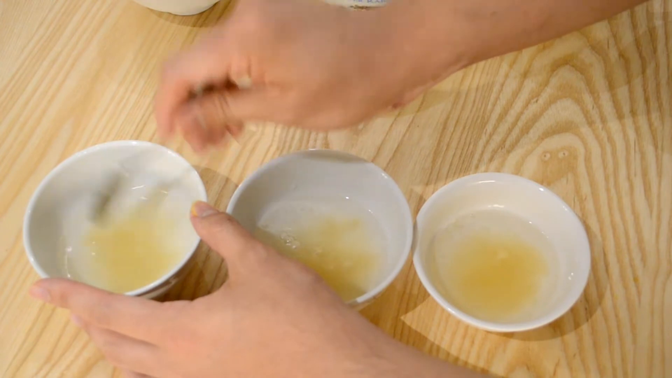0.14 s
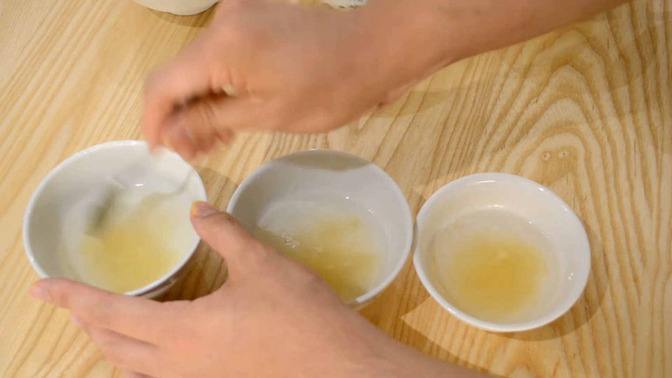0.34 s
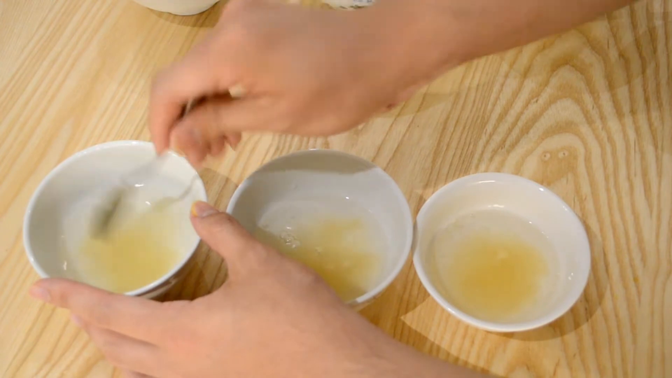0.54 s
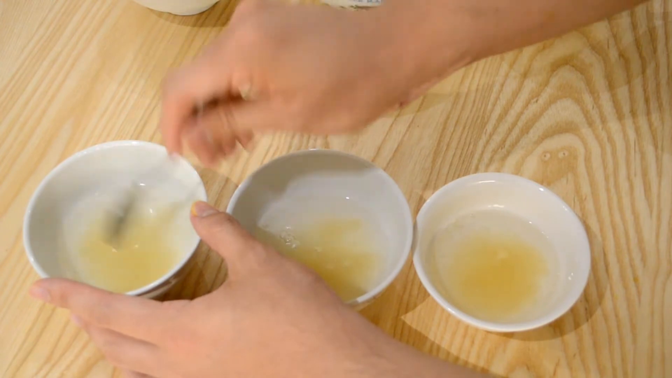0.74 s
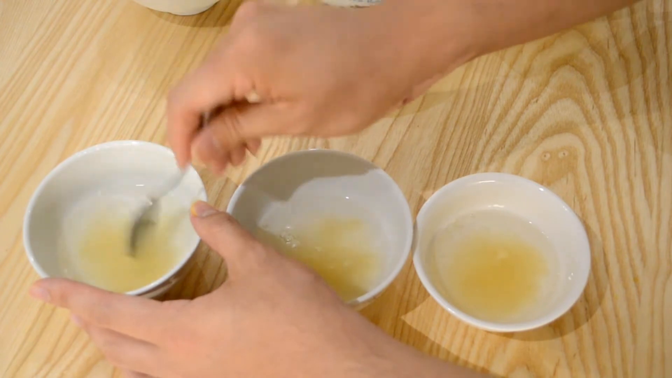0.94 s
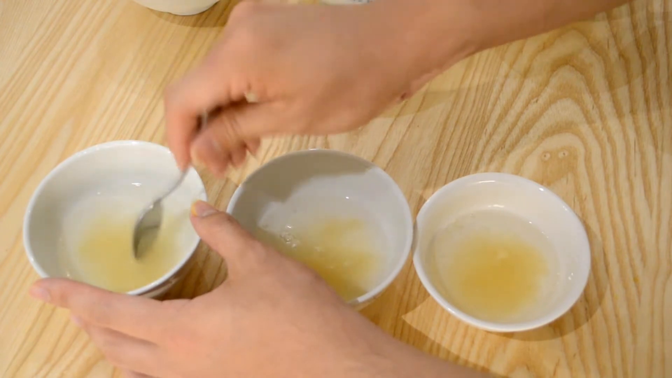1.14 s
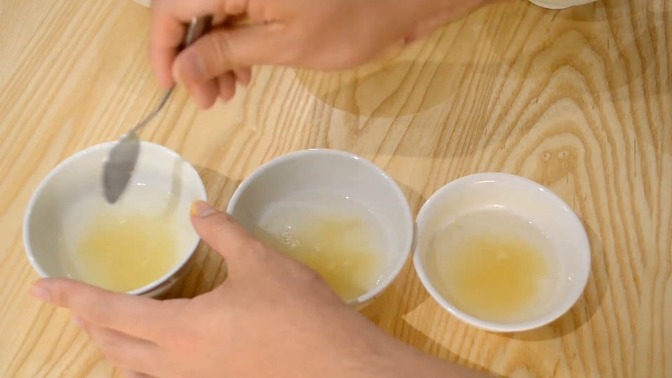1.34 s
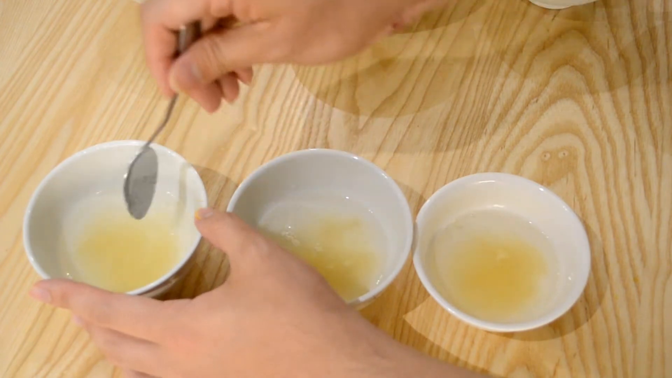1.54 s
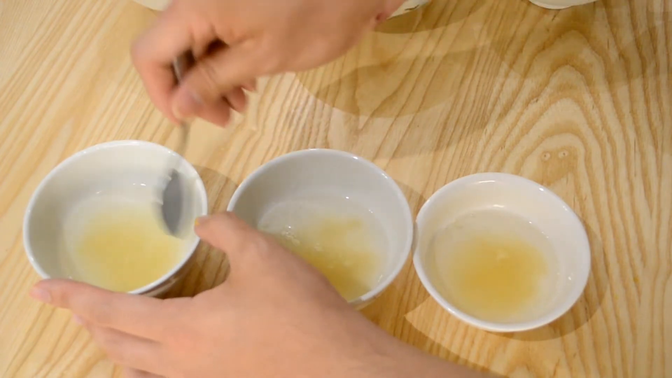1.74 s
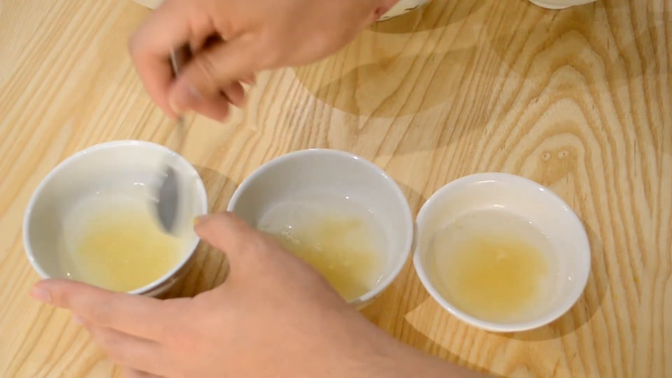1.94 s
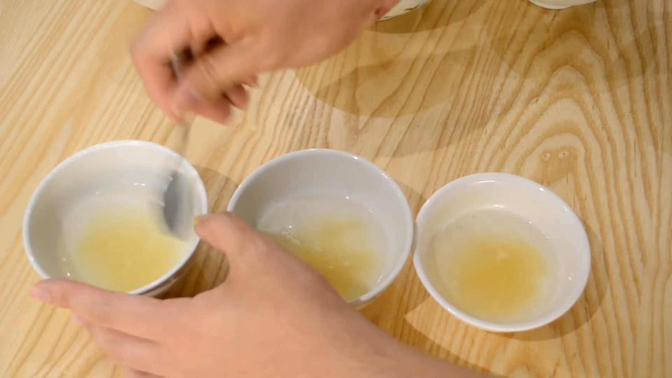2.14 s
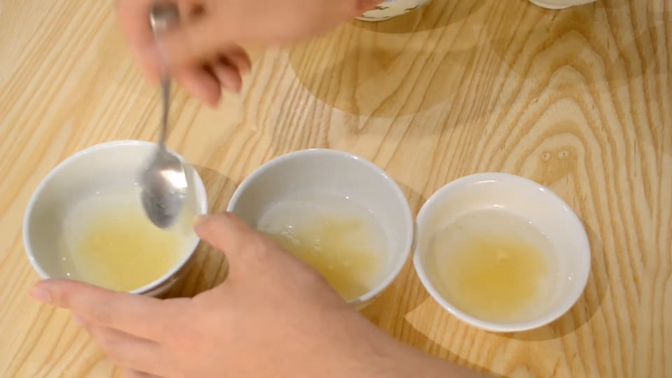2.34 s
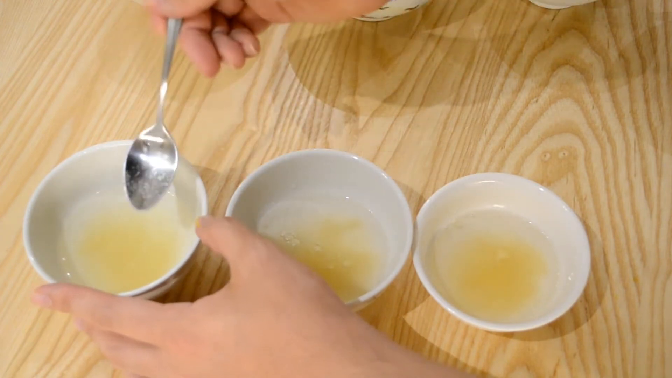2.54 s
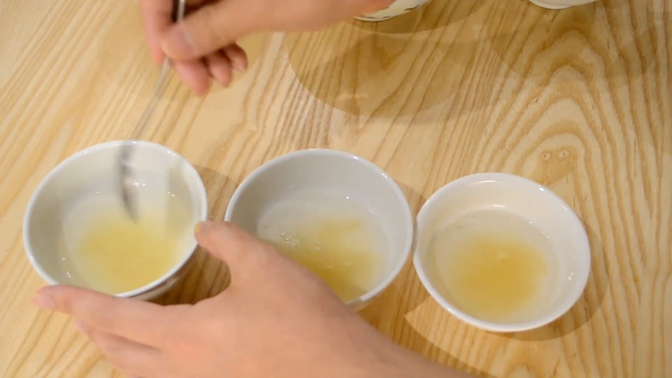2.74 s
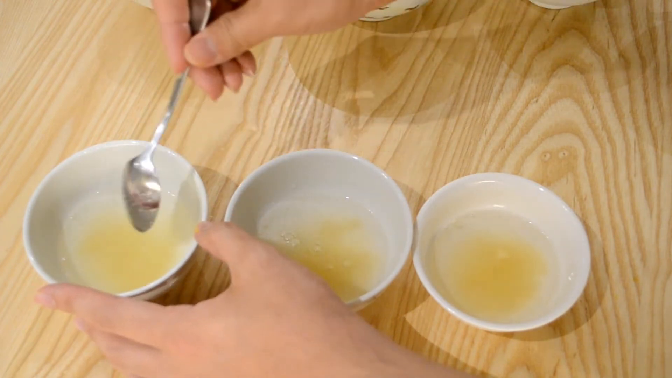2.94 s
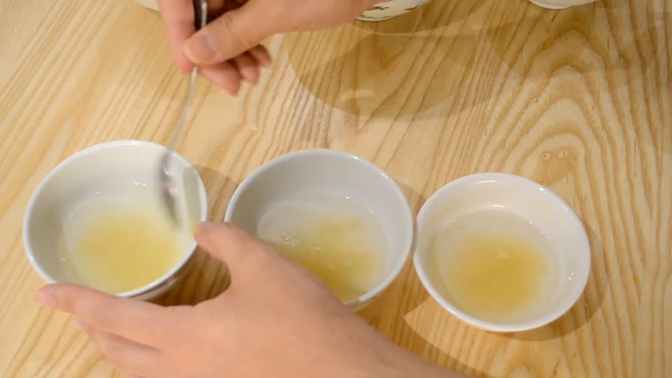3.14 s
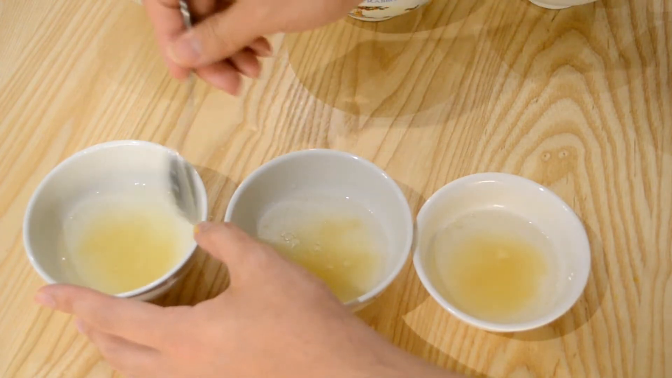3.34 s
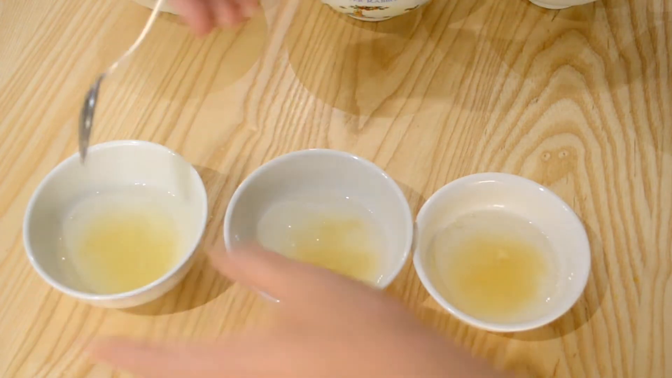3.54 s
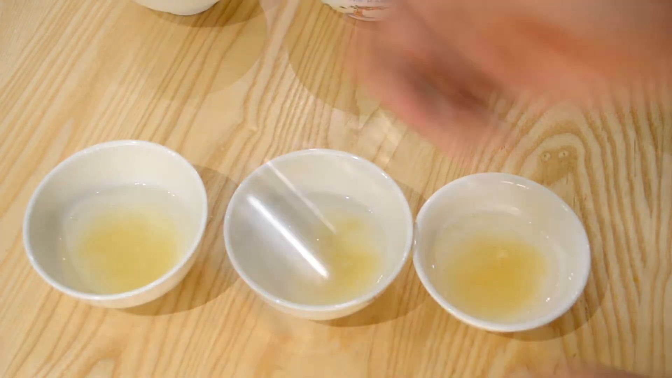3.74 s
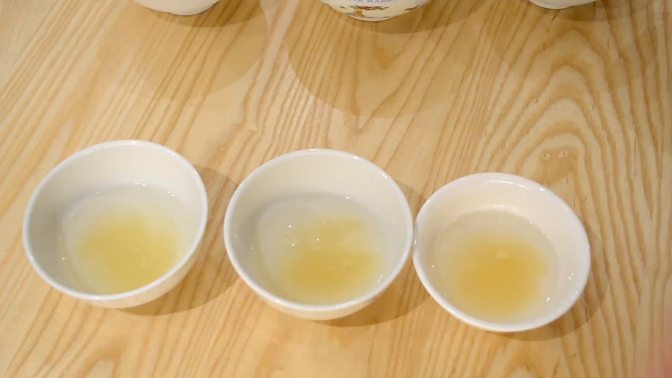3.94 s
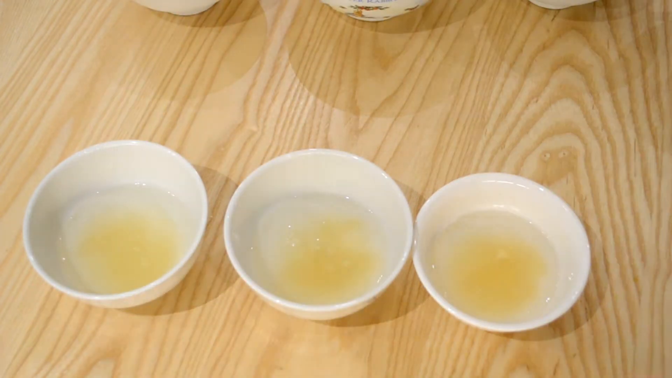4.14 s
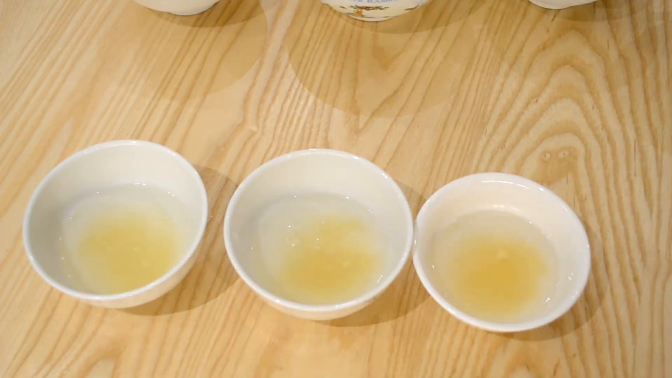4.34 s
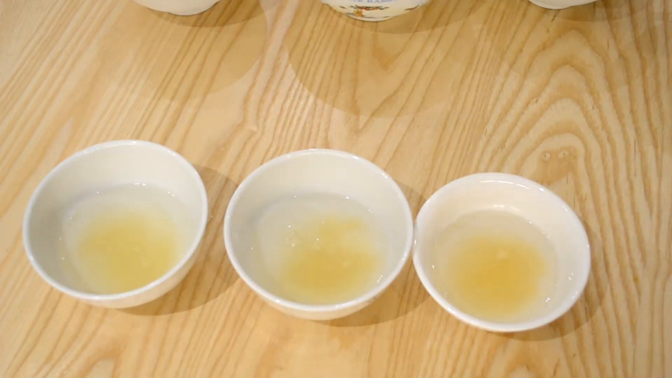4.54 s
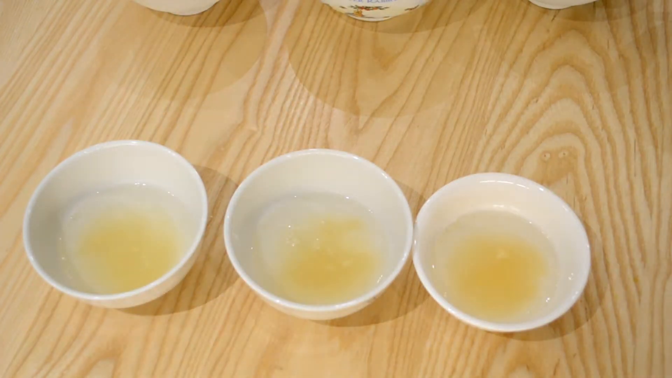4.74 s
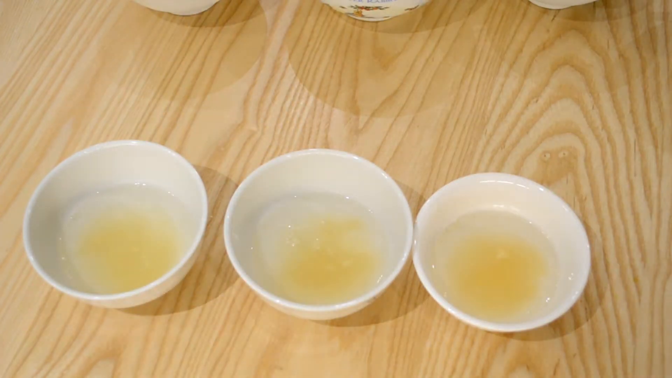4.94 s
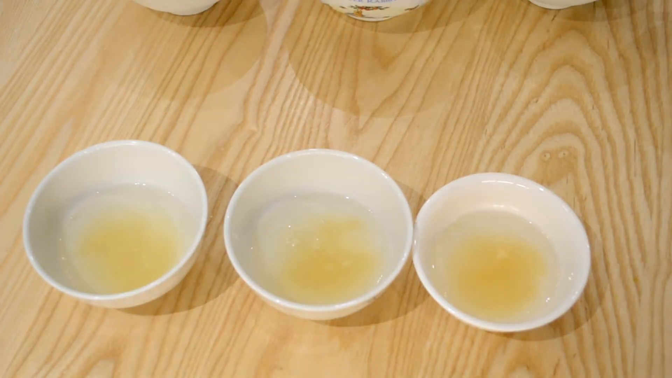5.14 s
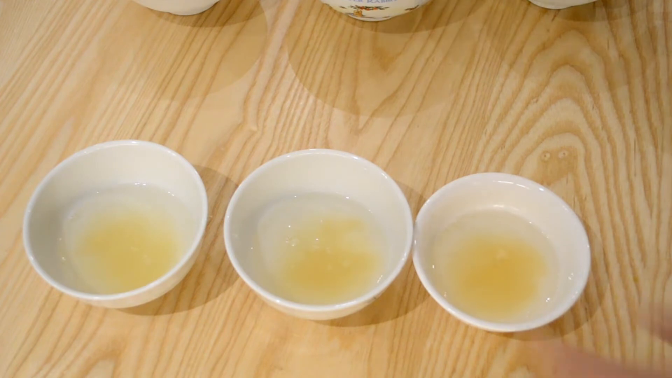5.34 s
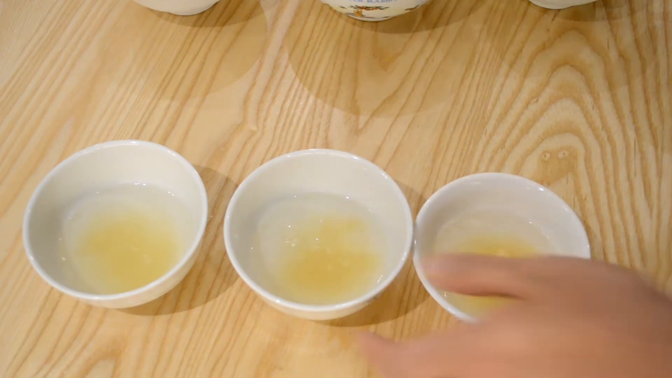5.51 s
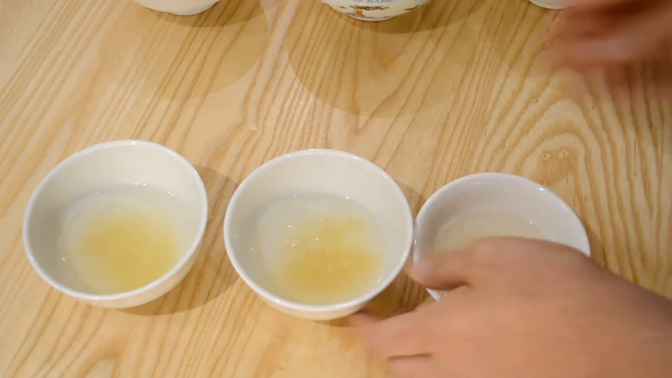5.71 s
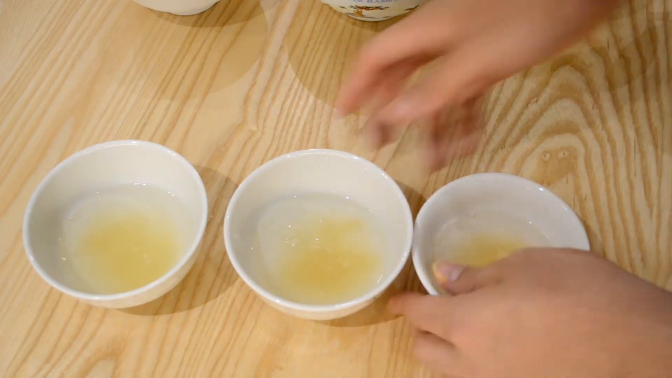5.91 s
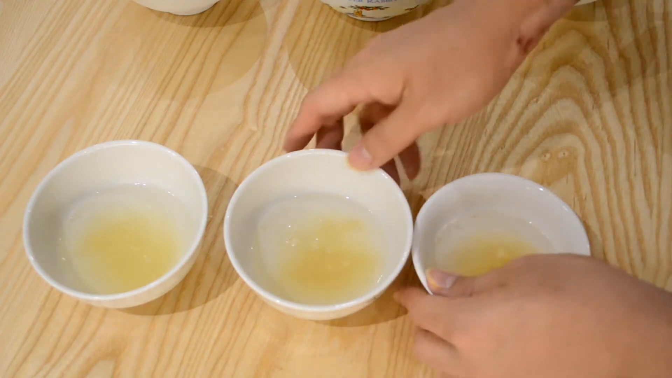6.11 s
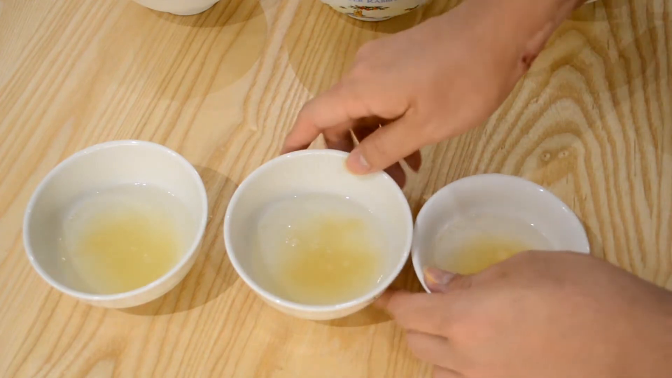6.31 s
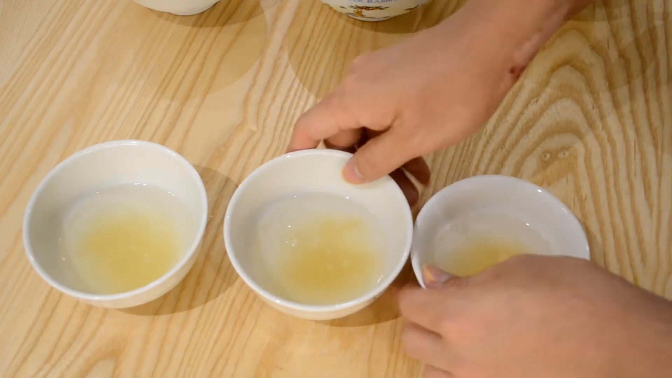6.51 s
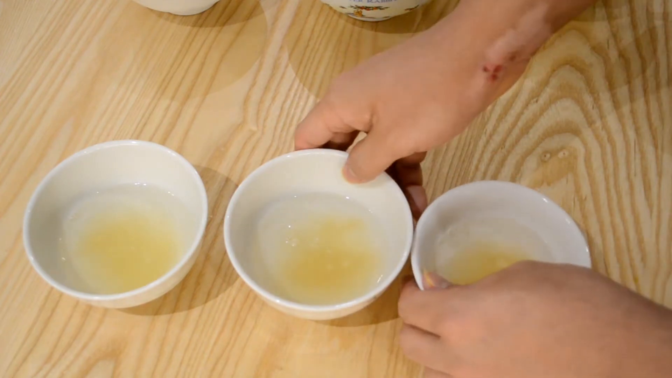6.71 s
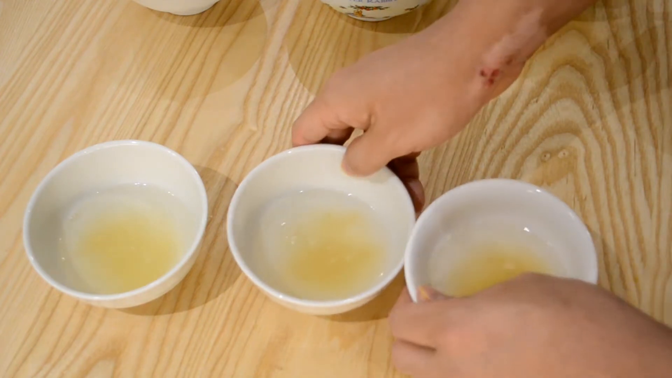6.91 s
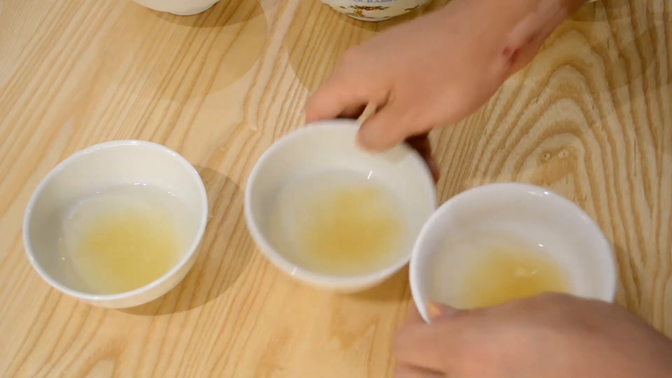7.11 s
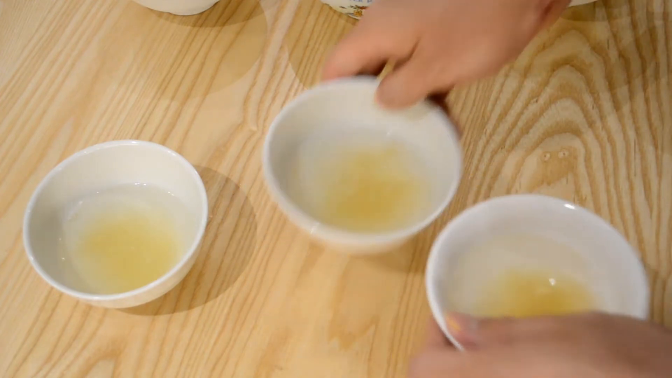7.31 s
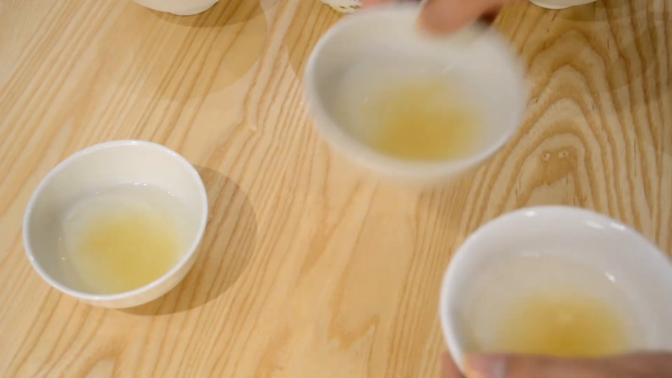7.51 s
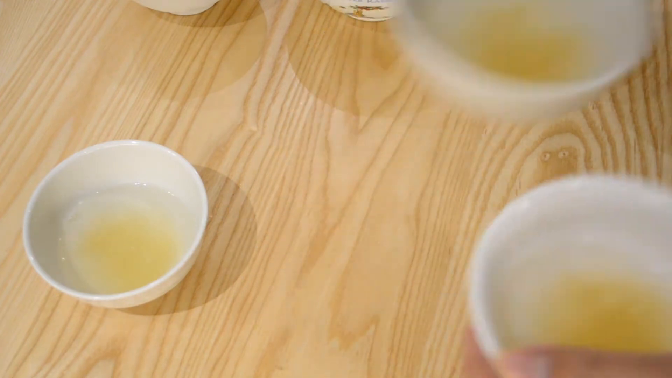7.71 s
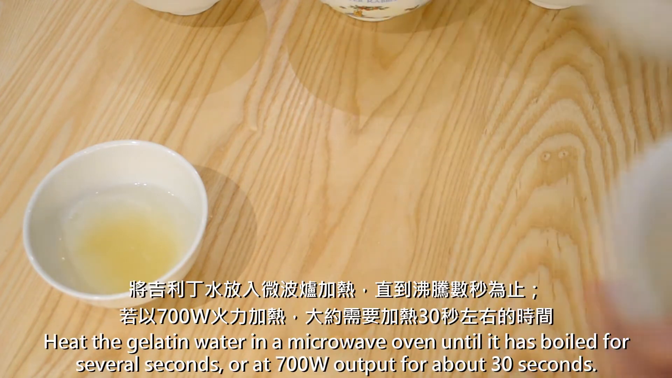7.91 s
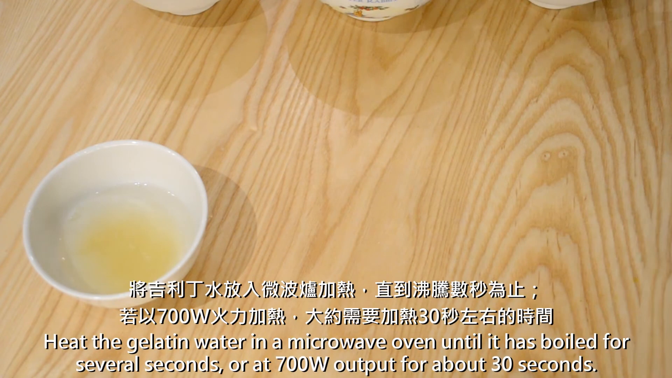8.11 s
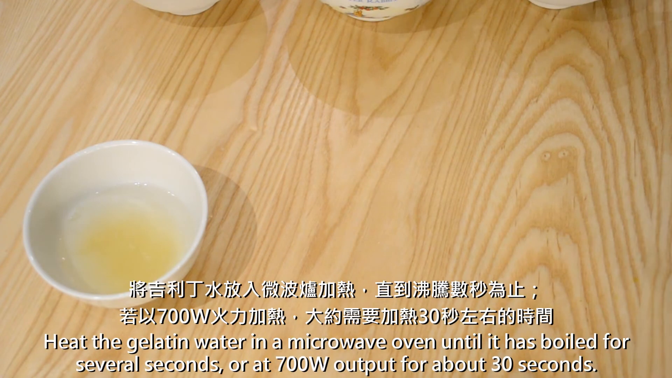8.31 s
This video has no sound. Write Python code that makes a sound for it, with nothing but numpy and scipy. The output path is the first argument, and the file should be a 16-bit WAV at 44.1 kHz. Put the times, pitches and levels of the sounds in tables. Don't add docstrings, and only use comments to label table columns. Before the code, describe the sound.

A steel spoon knocks dully inside a hand-held ceramic bowl, then taps its rim with clear rings, followed by quiet handling in a live kitchen.

```python
import sys
import numpy as np
from scipy import signal
from scipy.fft import rfft, irfft
from scipy.io import wavfile
from scipy.ndimage import uniform_filter1d

SR = 44100
rng = np.random.default_rng(int(sys.argv[2]) if len(sys.argv) > 2 else 0)


def wrap_up_sound(samples):
    columns = np.atleast_2d(samples).T
    tamed = np.clip(columns, -1, 1)
    steps = np.round(tamed * 32767).astype(np.int16)
    wavfile.write(sys.argv[1], SR, steps)


def volts_from_db(level):
    exponent = np.asarray(level, float) / 20
    return 10 ** exponent


N = 373080


# f/Hz, density/dB
HUM_SPECTRUM = [(25, -16.5), (70, -25.5), (150, -7.5), (330, -2), (1170, -2), (2300, -12), (9460, -41),
                (11900, -54.5)]
HUM_DB = -53
FLOOR_KNOCKS = [
    (0.328, -0.5, 0.5, 2, -3),
    (0.547, -2.5, 1.5, 2.5, -2.5),
    (0.754, 1.5, 0, 2, -3.5),
    (0.982, 1.5, -0.5, 1, -3.5),
    (1.177, 1, 0.5, -0.5, -2.5),
]
EARLIER_KNOCK = [
    (-0.062, -6, 0.014, 1, -4),
]
# f/Hz, level/dB, t60/s
HELD_BOWL = [(367, -9, 0.0091), (545, -9, 0.014), (808, -7.5, 0.014), (1237, 0, 0.0058), (1630, 0, 0.0066),
             (2333, -6.5, 0.007), (2870, -5, 0.0039), (3668, -12, 0.0035), (4460, -8, 0.0045),
             (6000, -7, 0.0028), (6780, -13, 0.003), (8540, -12, 0.0037), (10240, -14, 0.0039),
             (11200, -14.5, 0.0019)]
# f/Hz, level/dB, t60/s
TABLE_HUM = [(378, -6.5, .35), (474, -2.5, 0.39), (697, -5, .3), (693, -4.5, 0.45), (828.3, 0.5, 0.34),
             (1092, -1, 0.77), (1261.3, -3.5, 0.51), (1390, -7, .45), (1450, -5, 0.47), (1700, -4, 0.45),
             (1950, -8.5, 0.53), (4300, -20, .06)]
FINGER_BLOWS = [
    (0.097, -7.5, 7, -6, 0),
    (6.619, -22.5, 1.1, 1.5, 0),
    (6.721, -26, 1, -3.5, 0),
]
# f/Hz, level/dB, t60/s
WOOD = [(264.6, -9.5, 0.024), (390, -0.5, 0.025), (515, -4, 0.035), (742, -6.5, 0.018),
        (1200, -17.5, 0.014)]
# t/s, thud level/dB, ring level/dB, brightness/(dB/octave), third mode extra level/dB
RIM_TAPS = [
    (1.781, -16.5, -44, -6.5, -0.5),
    (1.986, -19, -37.5, 2, 5),
    (2.157, -15.5, -34.5, 3, 3),
    (2.347, -17, -39, -5.5, -7),
    (3.362, -20, -33, 1, 2),
]
# f/Hz, level/dB, t60/s, split/Hz, free twin level/dB, free twin t60/s
RIM = [(1516, 2, .15, -8.5, -4.5, 0.93), (3587, 5, 0.059, -12, -11, .45),
       (6378, 3.4, 0.098, -14.5, -18, 0.41), (9750, -0.84, 0.074, 9.5, -15, .36)]
# f/Hz, level/dB, t60/s
SPOON = [(2260, -16, 0.0019), (3030, 0, 0.0012), (4130, -4.5, 0.0054), (4834, -12, 0.069),
         (5430, -15.5, .05), (5150, 3.5, 0.0036), (6600, 2, 0.019), (7060, 1, 0.0039),
         (8560, -12.5, 0.0053), (8950, -19.5, 0.06), (10400, -10.5, 0.0026), (11050, -11.5, 0.037)]
# f/Hz, level/dB, t60/s
THUD = [(296, -8.5, 0.027), (480, -8, 0.025), (697, -9.5, 0.023), (1115, -5.5, 0.0041), (1700, -12, .006),
        (2880, -19, 0.0051)]
CHATTER = [
    (1.8033, -33.5, -1, -13.5, 0),
]
# f/Hz, level/dB, t60/s
HANDLE = [(5135, 1.5, 0.041), (7750, -8, 0.0095), (11040, -18, 0.062)]
TICKS = [
    (3.745, -96, 10, -4, 10),
    (3.76, -94, 10, -4, 10),
    (3.778, -97, 10, -4, 10),
    (6.318, -44, -8, -10, -8),
]
# f/Hz, level/dB, t60/s
TICK_STEEL = [(4600, 0, .005), (5200, -2, .005), (9600, -3, .01), (10300, 0, .012)]
LAID = [
    (4.479, -29, 0.5, 6, -2),
    (4.507, -30, -1.5, 3.5, -1.2),
]
# f/Hz, level/dB, t60/s
LAID_ON = [(790, 0, 0.023), (1330, 0.5, 0.019), (1640, -1, 0.033), (2250, -2, 0.017), (2980, -2, 0.0077),
           (4200, -7.5, 0.0053), (5770, -18, 0.012), (8500, -27, 0.0045), (11300, -28, .005)]
# t/s of the fastest movement, level/dB
SLEEVE_SWELLS = [(4.54, -65), (4.88, -69.5), (5.2, -65.5), (5.54, -62), (5.85, -76), (7.96, -66),
                 (8.23, -63)]
SLEEVE_RISE_DB_S, SLEEVE_FALL_DB_S = 104, 59
# f/Hz, level/dB
CLOTH = [(1500, -46.5), (2800, 1.5), (4000, 1.5), (7000, -7), (11000, -13.5)]
ROCKS = [
    (4.917, -20.5, -5, 9.5, 0),
    (4.933, -23.5, -7, 14, 0.0076),
    (4.959, -22, -5, 10, 0),
    (4.976, -29, -2, 4, 0),
]
# f/Hz, level/dB, t60/s
DISH = [(391, -14, 0.047), (736, -6, 0.016), (1250, 1.5, 0.005), (2080, -1.5, 0.0038), (2800, -3.5, 0.0053),
        (3270, -4.5, 0.0052), (3920, -3.5, 0.0037), (5500, -10.5, 0.0035), (7060, -19, 0.0018),
        (9400, -28, 0.0022)]
DISH_BLOW = [
    (4.916, -23, -2, -6.5, 0),
]
# f/Hz, level/dB, t60/s
DISH_RING = [(4543, -1, 0.077), (4802, -27, .3), (5860, -9, 0.42), (8680, -15, 0.079), (8960, -24.5, 0.46),
             (10980, -22, 0.13)]
TOUCH = [
    (6.881, -21, 3.5, 5, 0),
    (6.907, -24, -1, -6.5, 0),
]
# f/Hz, level/dB, t60/s
TWO_BOWLS = [(236, 2, 0.046), (364, -2.5, 0.05), (572, -6.5, 0.054), (860, -0.5, 0.03), (1380, 3, 0.01),
             (2050, 5, 0.0049), (2620, 5.5, 0.0017), (3670, -9.5, 0.013), (4105, -14.5, 0.08),
             (4190, -10, 0.039), (4830, -5, 0.0026), (6480, -15, 0.056), (7470, -14, 0.012),
             (9900, -20, 0.029)]
# f/Hz, t60/s
KITCHEN_T60 = [(250, 0.36), (500, 0.43), (1000, 0.69), (2000, 0.77), (4000, 0.62), (8000, 0.5),
               (12000, .35)]
# f/Hz, level/dB
MIC = [(100, -32.5), (230, -21.5), (350, -3.5), (10500, 2.5), (11500, -16.5), (12200, -55)]
# f/Hz, level/dB
PORT_NOTCH = [(7100, 2.5), (7600, 3), (7900, -5), (8300, 0.5), (8800, 2.5)]
CEILING = 1.0
FLIGHT_S = 0.0012
TABLE_ECHO_S, TABLE_ECHO_DB, TABLE_ECHO_DULL = 0.0016, -6.5, -0.5


def on_log(hz, points):
    points_hz, values = np.array(points).T
    return np.interp(np.log(hz + 1), np.log(points_hz), values)


def colour(x, points):
    gain = volts_from_db(on_log(np.fft.rfftfreq(len(x), 1 / SR), points))
    return irfft(rfft(x) * gain, len(x))


def causal(x, points):
    gain = volts_from_db(on_log(np.fft.rfftfreq(2048, 1 / SR), points))
    cepstrum = irfft(np.log(gain))
    cepstrum[1:1024] *= 2
    cepstrum[1025:] = 0
    response = irfft(np.exp(rfft(cepstrum)))[:1024]
    return signal.fftconvolve(x, response)[:len(x)]


def add(track, sound, s):
    i = int(round((s + FLIGHT_S) * SR))
    part = sound[max(-i, 0):N - i]
    start = max(i, 0)
    track[start:start + len(part)] += part


def ring(hz, db, t60):
    length_s = min(1.2 * np.max(t60), 1)
    t = np.arange(int(length_s * SR))[:, None] / SR
    sense = (-1.) ** np.arange(len(hz))
    decay = volts_from_db(-60 * t / np.maximum(t60, 0.002))
    return np.sin(2 * np.pi * hz * t) * decay @ (sense * volts_from_db(db))


def kitchen(build_s=0.0012):
    t = np.arange(int(0.9 * SR)) / SR
    octave = np.log2(np.fft.rfftfreq(len(t), 1 / SR) + 1)
    band_octave = np.log2(np.array(KITCHEN_T60)[:, 0])
    arrivals = rfft(rng.standard_normal(len(t)))
    tail = np.zeros(len(t))
    for k, (hz, t60) in enumerate(KITCHEN_T60):
        share = np.interp(octave, band_octave, np.arange(len(KITCHEN_T60)) == k)
        tail += irfft(arrivals * share, len(t)) * volts_from_db(-60 * t / t60) / np.sqrt(t60)
    tail *= 1 - np.exp(-t / max(build_s, 1e-4))
    return tail / np.sqrt(np.sum(tail ** 2))


def strikes(events, modes, scatter_db=2.0, moved=0.45, echo_db=-9):
    hz, db, t60 = np.transpose(modes)
    chance = rng.standard_normal((len(events), len(modes)))
    octaves = np.log2(hz / 1500)
    heard, usual = np.zeros(N), kitchen()
    for (s, blow_db, bright, room_db, room_bright), luck in zip(events, chance):
        struck_db = blow_db + db + scatter_db * luck
        answer = np.cos(moved) * usual + np.sin(moved) * kitchen()
        direct = ring(hz, struck_db + bright * octaves, t60)
        echo = ring(hz, struck_db + echo_db + (bright + TABLE_ECHO_DULL) * octaves, t60)
        to_room = ring(hz, struck_db + room_db + room_bright * octaves, t60)
        add(heard, direct, s)
        add(heard, echo, s + TABLE_ECHO_S)
        add(heard, signal.fftconvolve(to_room, answer), s)
    return heard


def hum(sway_db=0.4):
    air = colour(rng.standard_normal(N), [(12, -61)] + list(HUM_SPECTRUM) + [(18000, -110)])
    step = SR // 3
    drift = np.repeat(rng.standard_normal(N // step + 1), step)
    sway = uniform_filter1d(drift, step)[:N]
    return air / np.std(air) * volts_from_db(HUM_DB + sway_db * sway)


def knocks(table_db=-34):
    humming = [(hz, db + table_db, t60) for hz, db, t60 in TABLE_HUM]
    blows = list(EARLIER_KNOCK) + list(FLOOR_KNOCKS)
    return strikes(blows, list(HELD_BOWL) + humming, scatter_db=2.2, moved=0.4, echo_db=TABLE_ECHO_DB)


def fingers():
    return strikes(FINGER_BLOWS, WOOD)


def rim_taps(ring_db=4, crack_db=17, thud_db=3, ring_room_db=1.5, crack_room_db=-5, thud_room_db=3.0):
    hz, rim_db, t60, split, twin_db, twin_t60 = np.transpose(RIM)
    spoon_hz, spoon_db, spoon_t60 = np.transpose(SPOON)
    thud_hz, body_db, thud_t60 = np.transpose(THUD)
    pair_hz, pair_t60 = np.r_[hz, hz + split], np.r_[t60, twin_t60]
    bowl, crack, thud = np.zeros((3, N))
    scatter = rng.standard_normal((len(RIM_TAPS), len(SPOON)))
    for (heard_s, low_db, tap_db, bright, belly_db), luck in zip(RIM_TAPS, scatter):
        s = heard_s - FLIGHT_S / 2
        db = tap_db + rim_db + bright * np.log2(hz / hz[0]) + belly_db * (hz == hz[2])
        add(bowl, ring(pair_hz, np.r_[db, db + twin_db] + ring_db, pair_t60), s)
        add(crack, ring(spoon_hz, spoon_db + db[3] + crack_db + 4.6 * luck, spoon_t60), s)
        add(thud, ring(thud_hz, body_db + low_db + thud_db, thud_t60), s)
    sent = volts_from_db(ring_room_db) * bowl + volts_from_db(crack_room_db) * crack + volts_from_db(thud_room_db) * thud
    return bowl + crack + thud + signal.fftconvolve(sent, kitchen())[:N]


def handle_chatter():
    return strikes(CHATTER, HANDLE)


def steel_ticks():
    return strikes(TICKS, TICK_STEEL)


def spoon_laid_down():
    return strikes(LAID, LAID_ON)


def sleeves():
    t = np.arange(N) / SR
    swell = np.zeros(N)
    for s, db in SLEEVE_SWELLS:
        below_db = np.where(t < s, SLEEVE_RISE_DB_S * (s - t), SLEEVE_FALL_DB_S * (t - s))
        swell += volts_from_db(db - below_db)
    hiss = colour(rng.standard_normal(N), CLOTH)
    return swell * hiss / np.std(hiss)


def rocking_dish():
    return strikes(DISH_BLOW, DISH_RING) + strikes(ROCKS, DISH)


def bowls_touch():
    return strikes(TOUCH, TWO_BOWLS)


def scene():
    spoon_and_bowl = knocks() + rim_taps() + handle_chatter() + steel_ticks() + spoon_laid_down()
    around = fingers() + sleeves() + rocking_dish() + bowls_touch()
    housed = causal(spoon_and_bowl + around, MIC)
    return causal(housed + hum(), PORT_NOTCH)[None]


def top_cut(x):
    return signal.sosfilt(signal.butter(12, 12090, fs=SR, output="sos"), x)


def record(dry):
    mix = np.clip(dry, -CEILING, CEILING)
    return top_cut(mix)


dry = scene()
out = record(dry)
wrap_up_sound(out)
```